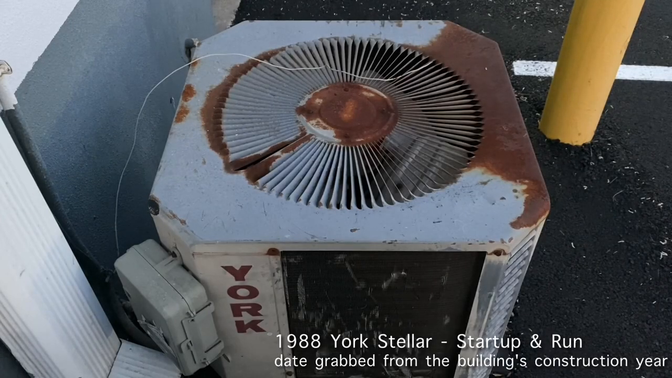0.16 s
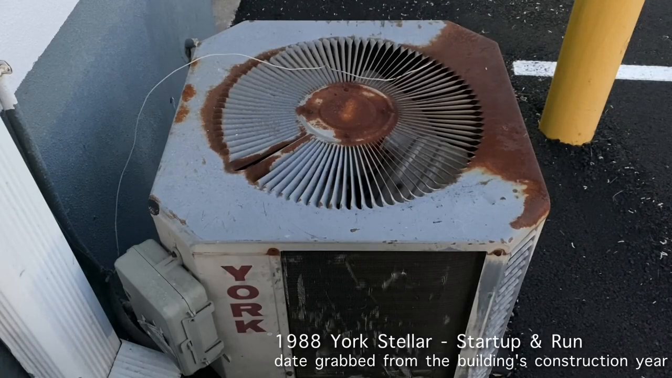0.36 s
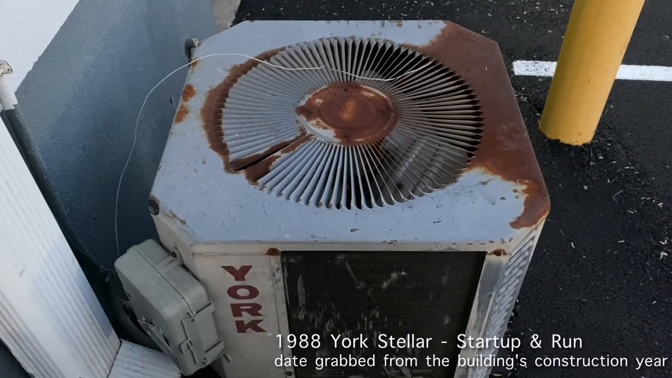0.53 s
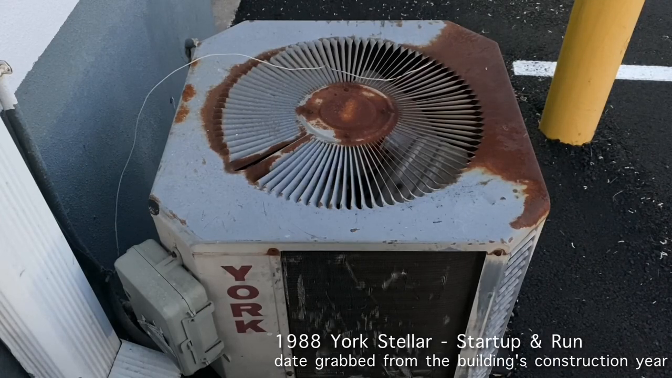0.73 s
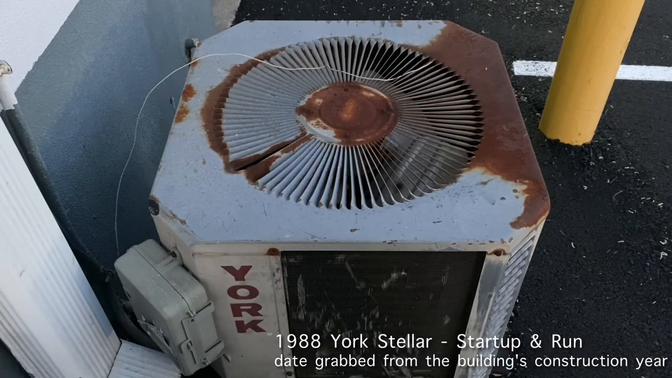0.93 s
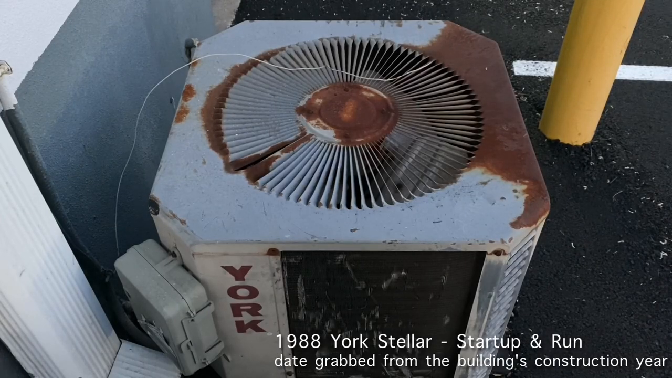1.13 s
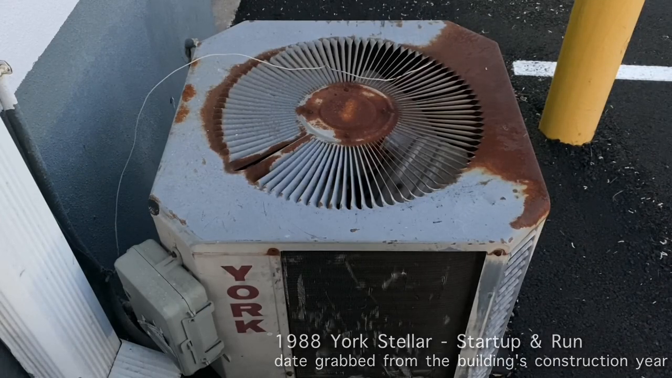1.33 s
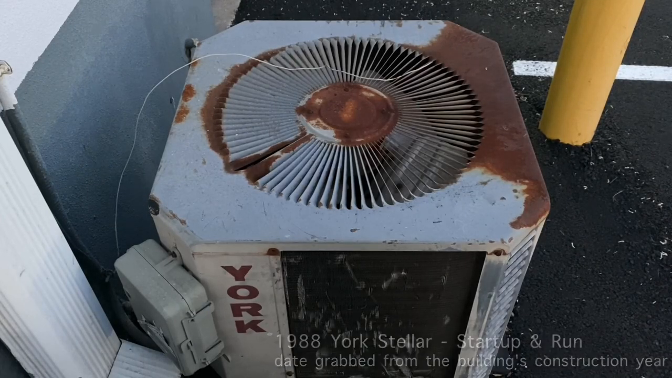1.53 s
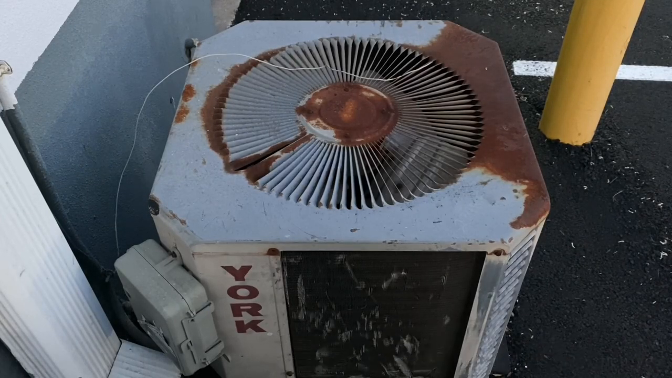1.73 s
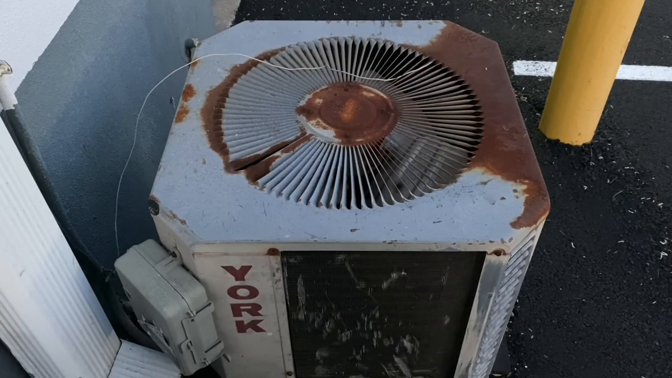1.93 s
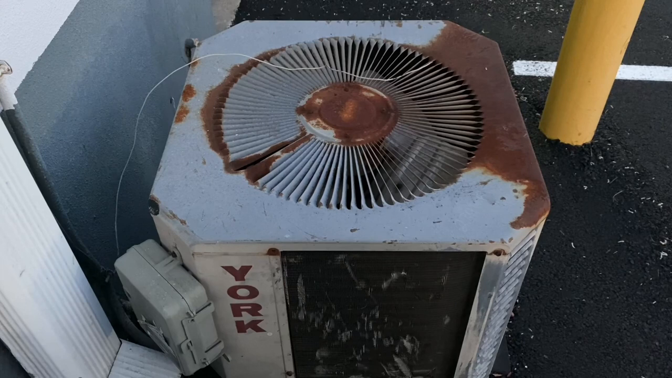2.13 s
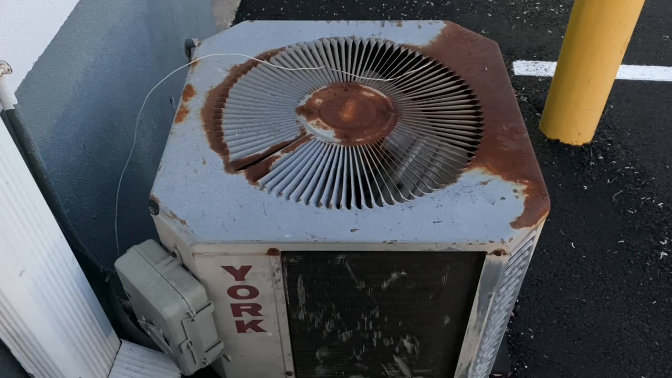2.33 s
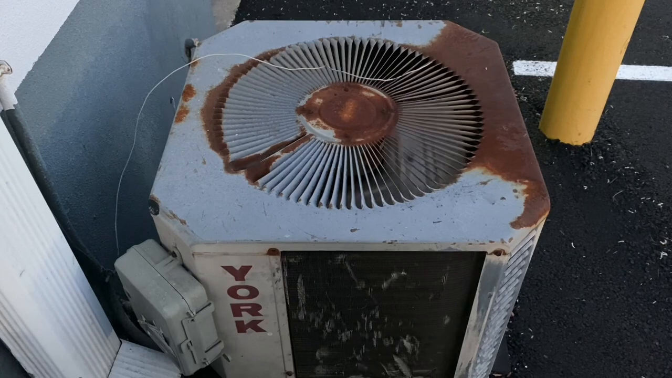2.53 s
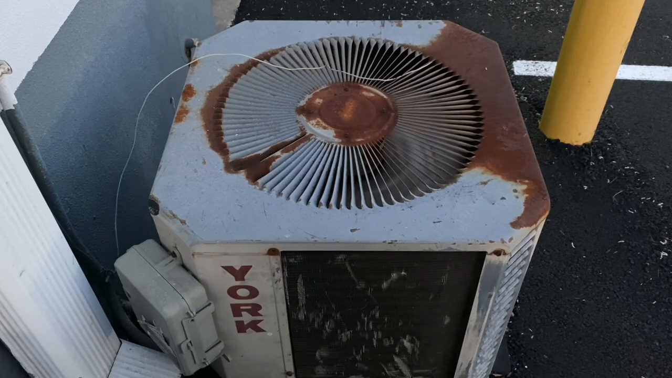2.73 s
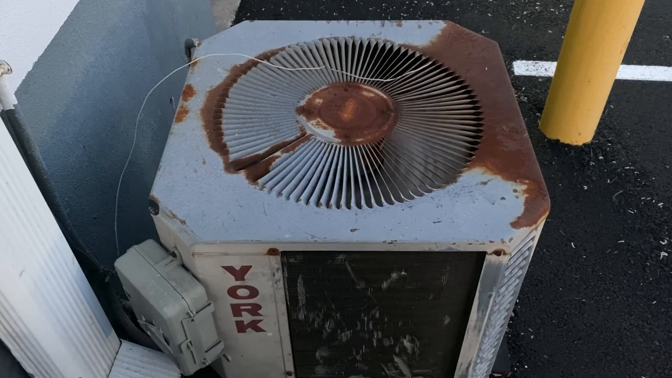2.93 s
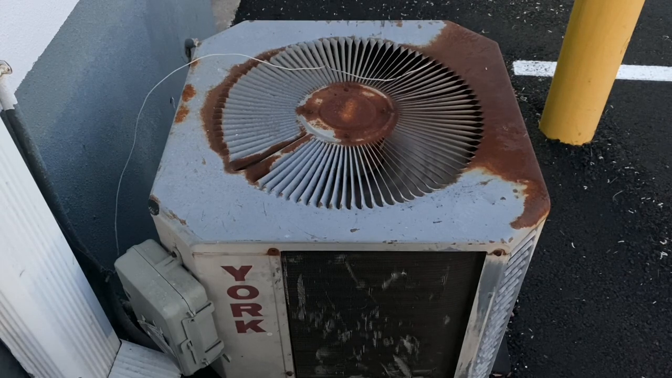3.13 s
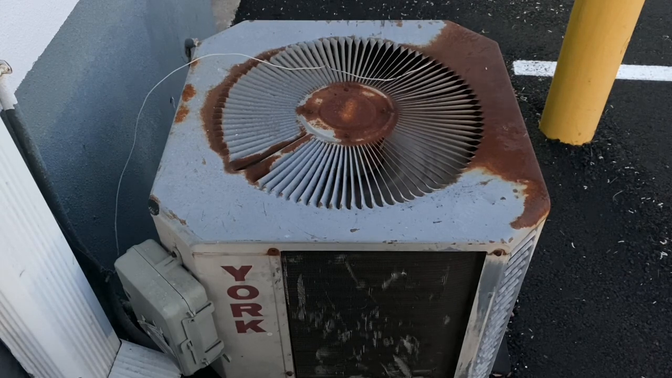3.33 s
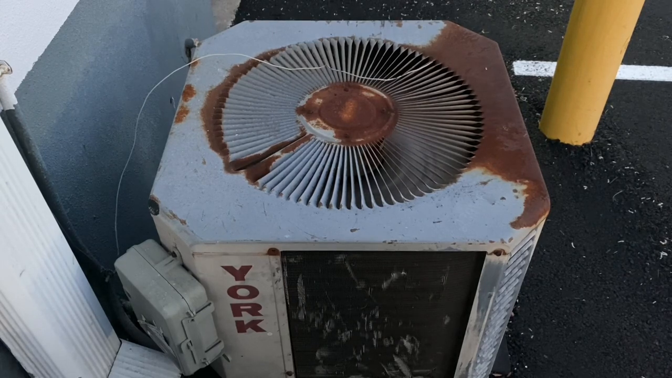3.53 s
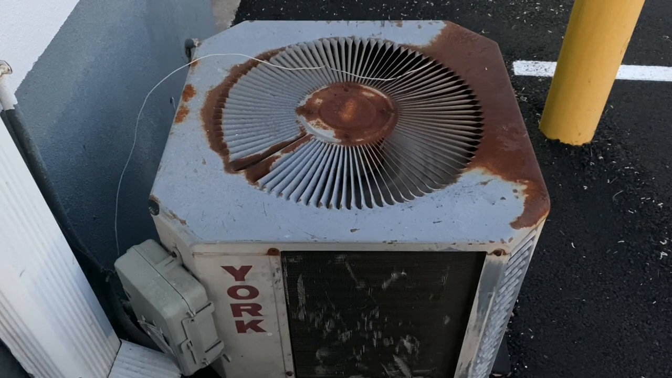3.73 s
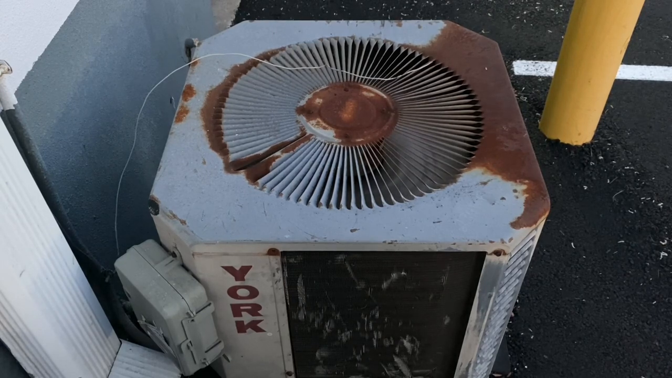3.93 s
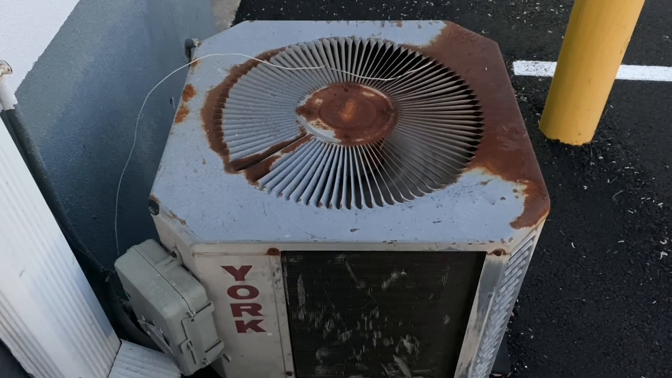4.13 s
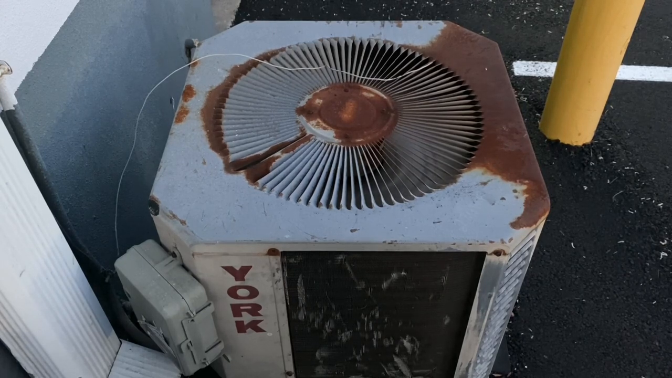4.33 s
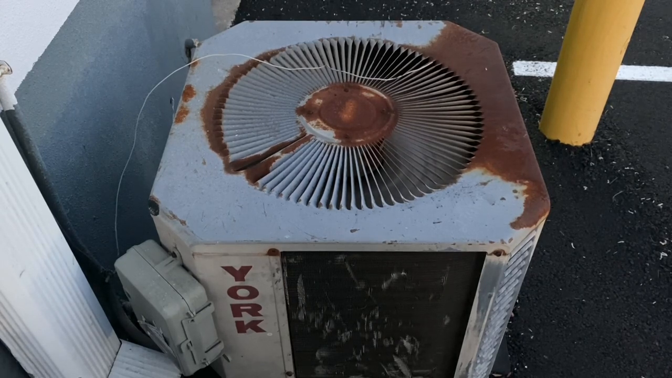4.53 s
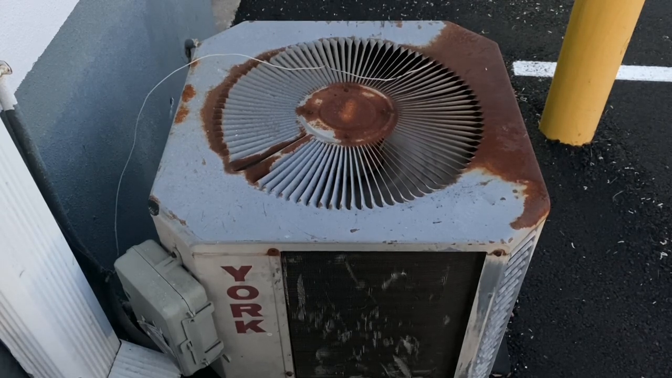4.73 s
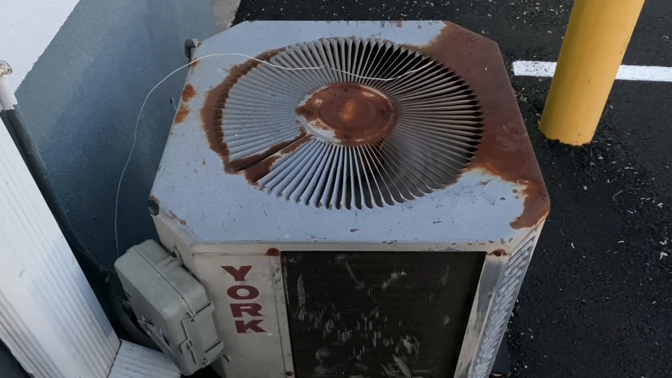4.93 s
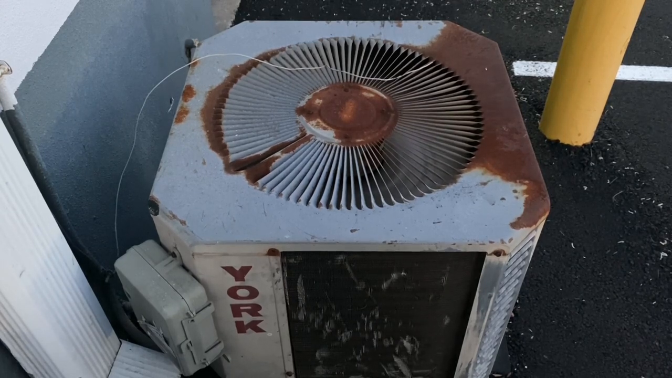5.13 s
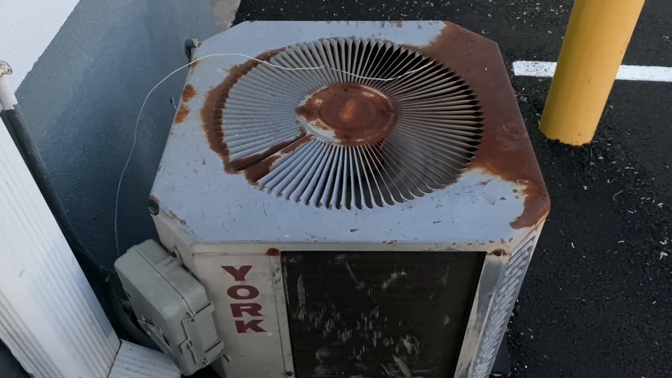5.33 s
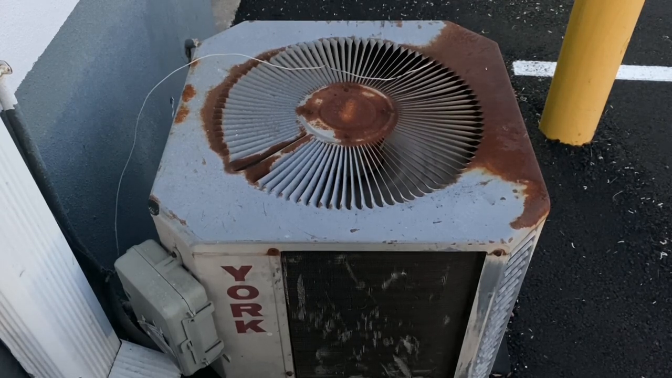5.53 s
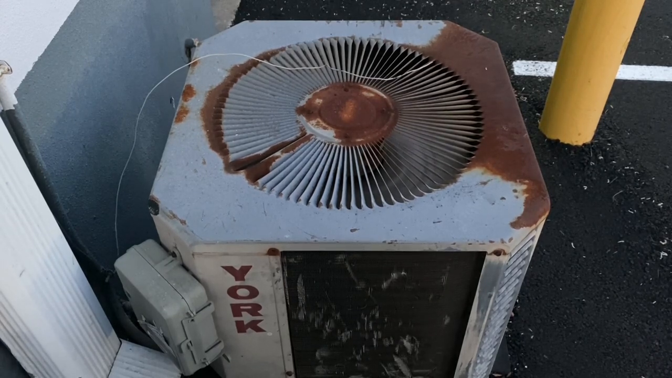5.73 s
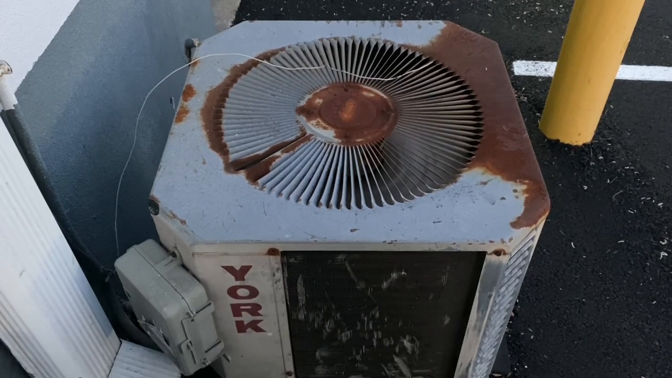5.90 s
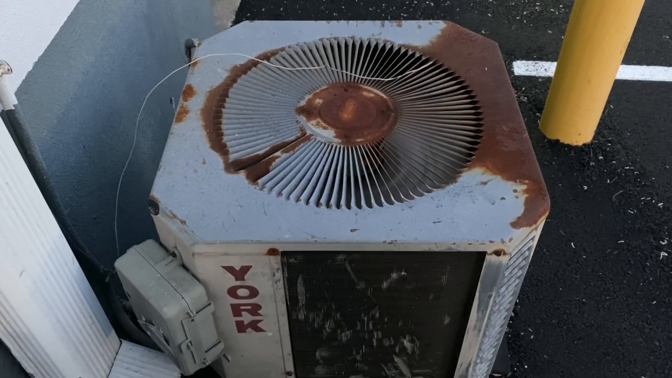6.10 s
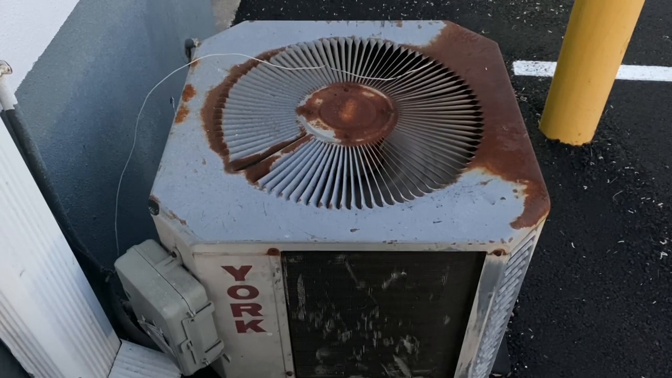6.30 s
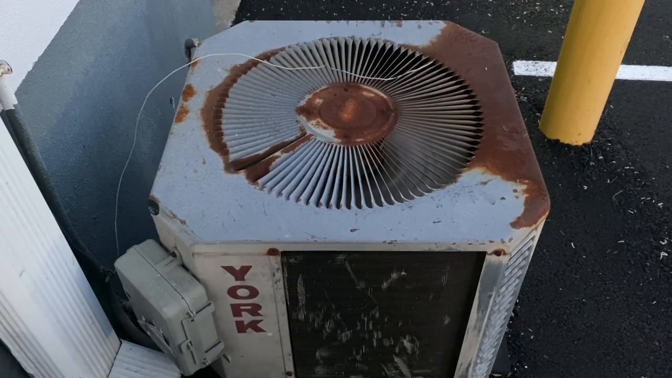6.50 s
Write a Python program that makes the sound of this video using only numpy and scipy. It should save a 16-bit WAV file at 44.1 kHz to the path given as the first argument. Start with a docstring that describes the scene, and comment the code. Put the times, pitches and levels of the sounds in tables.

```python
"""Distant machines drone over a deep rumble, with faint chirps; then an old outdoor air conditioner starts
close by, beside a wall. The contactor clacks and the cabinet rings; the compressor, built from harmonics
of its shaft, buzzes in, then mellows as pressure builds. Filtered noise makes the gas hiss and the fan air.
The fan's blade tones rise in pitch, and gusts flutter across the microphone pair as falling sines in noise."""
import sys
import numpy as np
from scipy import signal
from scipy.fft import rfft, irfft
from scipy.io import wavfile
from scipy.ndimage import uniform_filter1d

SR = 44100
rng = np.random.default_rng(int(sys.argv[2]) if len(sys.argv) > 2 else 0)


def digitize_waveform(pressure):
    """Quantize a signal to 16-bit integers and store it at the path in sys.argv[1].

    Rows of a 2-D input are taken as channels; values are limited to [-1, 1].
    """
    field = np.atleast_2d(pressure).T
    bounded = np.clip(field, -1, 1)
    quanta = np.round(bounded * 32767).astype(np.int16)
    wavfile.write(sys.argv[1], SR, quanta)


N = 289296
T = np.arange(N) / SR  # time of every sample (s)
HZ = np.fft.rfftfreq(N, 1 / SR)  # frequency of every spectrum bin

START_S = 2.567  # the motors switch in
BUZZ_ATTACK_S, SPIN_UP_S = 0.0033, 0.6  # time constants of the compressor's and the fan's start
FREE_SHAFT_HZ, LOADED_SHAFT_HZ = 58.47, 58.345  # the shaft sags as the pressure builds
VALVE_LAG_TURNS = .5  # how long after the knock the discharge valve sounds


def amp(db):
    """Decibels to gain."""
    return 10 ** (np.asarray(db) / 20)


def unit(x):
    """Scales to rms 1."""
    return x / np.sqrt(np.mean(x ** 2) + 1e-20)


def over_hz(points, hz):
    """Reads a spectrum on a log-frequency axis."""
    f, value = np.transpose(points)
    return np.interp(np.log(hz + 1), np.log(f + 1), value)


def over_time(points, column=1):
    """Reads one column of a control curve at every sample."""
    rows = np.transpose(points)
    return np.interp(T, rows[0], rows[column])


def add(mix, s, sound):
    """Mixes a sound in at time s."""
    part = mix[round(s * SR):][:len(sound)]
    part += sound[:len(part)]


def rise(s, width_s):
    """An S-curve from 0 to 1, halfway at time s."""
    return .5 + .5 * np.tanh((T - s) / (2 * width_s))


def onset(s, attack_s):
    """Nothing before time s, then an exponential approach to 1."""
    return 1 - np.exp(-np.maximum(T - s, 0) / attack_s)


def drift(per_s):
    """Random wandering around 0: per_s normal draws a second, joined by straight lines."""
    knots = rng.standard_normal(1024)
    return np.interp(T * per_s, np.arange(len(knots)), knots)


def noise(spectrum, apart, patchy_db=0, ripple_db=0):
    """Two-channel noise shaped in dB per Hz, with drifting patches and a fixed, random fine ripple over frequency.

    The share `apart` of its power is opposite in the two channels.
    """
    common, own = rng.standard_normal((2, N))
    apart = np.clip(apart, 0, 1)
    pair = np.sqrt(1 - apart) * common + np.sqrt(apart) * np.array([own, -own])
    z = signal.stft(pair, nperseg=1024)[2]
    blur = np.outer(np.hanning(7), np.hanning(30))
    patches = signal.fftconvolve(rng.standard_normal(z.shape[1:]), blur, "same")
    pair = signal.istft(z * amp(patchy_db * unit(patches)), nperseg=1024)[1][:, :N]
    ripple = np.interp(HZ, np.linspace(0, SR / 2, 600), rng.standard_normal(600))
    gain = amp(over_hz(spectrum, HZ) + ripple_db * ripple)
    return irfft(rfft(pair) * gain, N) * np.sqrt(SR / 2)


def tone(turns, db, in_step=False):
    """A sine of the given rms level, at a chance phase unless it runs in step with its drive."""
    phase = 0 if in_step else rng.random()
    return np.sqrt(2) * amp(db) * np.sin(2 * np.pi * (turns + phase))


def strokes(turns, orders, smear, apart, size=4096):
    """One ringing knock a turn; smear scatters the orders' phases, apart sets the channels against each other."""
    order, db = np.transpose(orders)
    shared, own = rng.standard_normal((len(order), 2)).T
    phase = smear * shared + apart * np.array([own, -own])
    lines = np.zeros((2, size // 2 + 1), complex)
    lines[:, np.rint(order).astype(int)] = amp(db) * np.exp(1j * phase)
    cycle = irfft(lines) * size / np.sqrt(2)
    return np.array([np.interp(turns % 1, np.arange(size) / size, c) for c in cycle])


def warming(turns, orders, warm, smear, apart):
    """A knock whose orders pass from their cold levels to their warm ones."""
    out = np.zeros((2, N))
    for k, cold_db, warm_db in orders:
        shared, own = rng.standard_normal(2)
        phase = smear * shared + apart * np.array([[own], [-own]])
        level = amp(cold_db + (warm_db - cold_db) * warm)
        out += np.sqrt(2) * level * np.cos(2 * np.pi * round(k) * turns + phase)
    return out


def pressure():
    """Head pressure climbs along an S-curve, from 0 at rest towards 1 in the steady run."""
    return rise(4.55, 0.497)


def shaft_turns(overshoot_turns=0.06, overshoot_s=0.098):
    """Turns of the compressor shaft since the start; it gains a little extra at first."""
    turns = np.cumsum(FREE_SHAFT_HZ + (LOADED_SHAFT_HZ - FREE_SHAFT_HZ) * pressure()) / SR
    return turns - np.interp(START_S, T, turns) - overshoot_turns * (1 - onset(START_S, overshoot_s))


def compressor(jitter_turns=0.0021, flicker_db=-1.5, stumble_extra=5.7, stumble_s=0.053):
    """Two pistons knock in a steel shell; panel and valves join in, the case rocks and the windings hum."""
    turns, load = shaft_turns(), pressure()
    # no two strokes are quite alike in timing or force, least of all the first few
    stumble = 1 + stumble_extra * (1 - onset(START_S, stumble_s))
    uneven = turns + jitter_turns * stumble * drift(70)
    force = amp(np.sqrt(stumble) * drift(40) + flicker_db * np.sqrt(load) * drift(14))
    buzz = force * (shell_knock(uneven) + panel_buzz(uneven))
    buzz += discharge_valve(turns, load) + valve_chatter(turns, load)
    return onset(START_S, BUZZ_ATTACK_S) * (buzz + motor_hum()) + case_rocking(turns)


def shell_knock(turns):
    """The pistons' knock rings the shell; its overtones shift as it warms, and the whole fades with time."""
    # the knock itself: shaft order, cold level/dB, warm level/dB, before the level curve
    knock_orders = [(21, -55, -65), (22, -47, -46.5), (23, -46.5, -49.5), (24, -34.5, -41.5),
                    (25, -45.5, -43.5), (26, -45, -45), (27, -58, -62), (28, -56, -48)]
    # its ringing overtones: shaft order, cold level/dB, warm level/dB, before the level curve
    ring_orders = [(29, -60, -59), (30, -46, -47.5), (31, -42.5, -55), (32, -47, -53), (34, -46.5, -48.5),
                   (36, -56, -59), (38, -55, -62), (40, -63, -68), (41, -52, -56), (43, -61, -63),
                   (44, -53, -51), (48, -74, -62), (49, -56, -54), (51, -57, -52), (52, -75, -53)]
    # gain of both, swelling after the start, then fading: t/s, level/dB
    cold_level = [(2.57, -2), (2.66, -0.5), (2.8, 2), (3.1, 0.5), (3.5, 0.5), (3.95, -0.5), (4.4, -4.5),
                  (5.0, -9), (5.6, -26)]
    warm = rise(3.2, 0.2)
    shell = warming(turns, knock_orders, warm, smear=0.2, apart=0.3)
    shell += warming(turns, ring_orders, warm, smear=1.0, apart=0.35)
    return amp(over_time(cold_level)) * shell


def panel_buzz(turns, lag_turns=.63):
    """A side panel answers late in each turn and the casing grumbles with it, until both die away."""
    # the panel's harmonics: shaft order, level/dB
    panel_orders = [(6, -48), (10, -62), (12, -50), (13, -59), (15, -57), (16, -43), (17, -44), (18, -50.5)]
    # the casing's grumble: f/Hz, level/dB per Hz
    grumble = [(150, -86), (300, -62.5), (480, -75), (620, -65), (850, -84), (1500, -105)]
    panel = strokes(turns - lag_turns, panel_orders, smear=0.3, apart=0.35)
    panel += noise(grumble, apart=0.23, patchy_db=-0.5)
    return (1 - rise(3.84, 0.19)) * panel


def discharge_valve(turns, load, run_db=0.5):
    """The discharge valve rasps under load, and taps brightly, half a turn after the knock."""
    # the shell's lines under pressure, moved to the nearest shaft order: f/Hz, level/dB before the run gain
    run_lines = [(1340, -55), (1572, -56), (1690, -58), (1981, -55), (2509, -57), (2568, -54.5),
                 (2681, -60), (3031, -57), (3149, -53), (3208, -59.5), (3262, -59), (3731, -62),
                 (3790, -63), (3849, -65), (3962, -62), (5190, -64), (5249, -67), (6880, -70)]
    # the tap's harmonics: shaft order, level/dB before the level curve
    tap_orders = [(73, -88), (74, -54), (75, -79), (76, -65), (77, -66), (78, -65), (79, -65), (80, -63.5),
                  (81, -57), (82, -64), (83, -79)]
    # gain of the tap: t/s, level/dB
    tap_level = [(2.9, -22), (3.2, -14), (4.55, -11), (4.72, 2), (4.95, 2.5), (5.2, 2.5), (5.42, -14),
                 (5.75, 1), (6.15, -2.5), (6.56, -4)]
    valve_turns = turns - VALVE_LAG_TURNS
    run_orders = np.array(run_lines) / [LOADED_SHAFT_HZ, 1]
    rasp = strokes(valve_turns, run_orders, smear=0.49, apart=0.22)
    taps = strokes(valve_turns + 0.00093 * drift(58), tap_orders, smear=0.17, apart=0.28)
    return load * amp(run_db + drift(12)) * rasp + amp(over_time(tap_level)) * taps


def valve_chatter(turns, load, uneven_db=3, shimmer_hz=0.33, start_db=0.5, fade_db=4.5, attack_s=0.048):
    """The valves chatter on the shaft orders from 4 to 259, softer as pressure builds."""
    # envelope over the orders: f/Hz, level/dB an order, before unevenness and gain
    valves = [(230, -53), (450, -79), (620, -45), (800, -62), (1150, -77), (1450, -56), (1650, -68),
              (2000, -55.5), (2750, -62), (3100, -68), (3900, -73), (4600, -69), (5600, -78), (15000, -103)]
    order = np.arange(4, 260)
    out = np.zeros((2, N))
    # three patterns melt steadily into one another
    for k in range(3):
        db = over_hz(valves, order * LOADED_SHAFT_HZ)
        db = db + uneven_db * (rng.standard_normal(len(order)) - .5)
        share = np.cos(np.pi * (shimmer_hz * T + k / 3)) * np.sqrt(2 / 3)
        out += share * strokes(turns, np.c_[order, db], smear=1.94, apart=0.58)
    return onset(START_S, attack_s) * amp(start_db - fade_db * load) * out


def motor_hum(mains_hz=60):
    """Magnetic hum of the windings on mains multiples; the shaft slips behind, so the two throb."""
    # multiple of the mains, level/dB, swells at t/s, rise time/s, level lost in the lull/dB
    hum_tones = [(2, -28.5, 3.08, 0.19, 29), (4, -34, 3.63, 0.35, 8.5), (6, -39.5, 3.24, 0.074, 7.5)]
    mains = mains_hz * (T - START_S)
    lull = rise(4.68, 0.12) - rise(5.805, 0.12)  # the hum sinks for a while
    hum = 0
    for k, db, s, rise_s, lull_db in hum_tones:
        hum = hum + rise(s, rise_s) * tone(round(k) * mains, db - lull_db * lull, in_step=True)
    return hum


def case_rocking(turns, sway_turns=0.024):
    """The case rocks on its feet at low shaft orders, then settles."""
    # shaft order, level/dB, swells at t/s, rise time/s, settles at t/s, settled level/dB
    rocking = [(1, -34, 3.5, 0.37, 4.87, -49), (2, -33, 2.6, 0.055, 4.35, -47),
               (3, -27.8, 2.564, 0.081, 4.24, -49), (6, -30, 3.62, 0.11, 4.06, -54.5),
               (8, -35, 3.6, .1, 4.1, -72), (10, -39, 3.55, 0.052, 4.57, -58)]
    swaying = turns + sway_turns * drift(22)
    return sum(swell_and_settle(*level) * tone(round(k) * swaying, 0, in_step=True) for k, *level in rocking)


def swell_and_settle(db, swell_s, rise_s, settle_s, settled_db, settling_s=0.16):
    """A gain that swells after the start and moves to its running level."""
    level = amp(db + (settled_db - db) * rise(settle_s, settling_s))
    return onset(START_S, BUZZ_ATTACK_S) * rise(swell_s, rise_s) * level


def contactor(crack_t60=0.048, tail_db=-12.0, tail_t60=0.28, ring_db=-32.5, dull_hz=3500, rattle_db=3.0):
    """The relay slams and bounces as decaying noise (t60 in s); the cabinet rings and rattles."""
    # the contact closing and bouncing: t/s, level/dB
    clacks = [(2.3347, -6), (2.3382, -1.5), (2.34, -4), (2.349, -16), (2.3635, -20)]
    # colour of the clack: f/Hz, level/dB per Hz, before the blows' levels
    clack_colour = [(90, -50), (300, -59), (460, -51), (680, -68), (1150, -50.5), (1450, -47.5),
                    (1780, -48), (2400, -63), (3300, -54), (4100, -50.5), (5100, -63), (6500, -58.5),
                    (11000, -61), (16000, -65)]
    # cabinet modes: f/Hz, level/dB before the ring gain, time to fall 60 dB/s
    cabinet = [(235, -1, 1), (582, -16, 0.44), (764, -12.5, 0.44), (980, -5.5, 0.31), (1226, -8, 0.3),
               (1900, -14, 0.38), (2270, -14, 0.26), (3670, -15, 0.22), (4030, -17, 0.17),
               (4440, -15, 0.14), (6340, 1, 0.048)]
    blows = np.zeros(N)
    for s, db in clacks:
        add(blows, s, amp([db]))
    t = T[:SR]

    def dying(t60):
        """Adds up the decaying power of all the blows."""
        return np.sqrt(abs(signal.fftconvolve(blows ** 2, amp(-120 * t / t60))[:N]))

    crack = noise(clack_colour, apart=0.11) * dying(crack_t60)
    low_pass = signal.butter(2, dull_hz, fs=SR)
    tail = signal.lfilter(*low_pass, noise(clack_colour, apart=0.35, ripple_db=1.5)) * dying(tail_t60)
    tail *= amp(rattle_db * drift(220))
    ring = np.zeros(N)
    add(ring, clacks[1][0], sum(tone(hz * t, db - 60 * t / t60) for hz, db, t60 in cabinet))
    return crack + amp(tail_db) * tail + amp(ring_db) * ring


def ticks(t60=0.037):
    """Loose metal knocks and ticks as the load comes on: short bursts around one pitch of the sheet metal."""
    # t/s, level/dB, f/Hz
    metal_ticks = [(2.5665, -29.5, 1470), (2.592, -28, 775), (2.629, -20, 372), (2.636, -27, 1495),
                   (2.658, -34, 2960), (2.663, -39, 720), (3.010, -41, 7800), (3.011, -45, 14000),
                   (3.322, -46, 13500), (3.324, -44, 7600)]
    out, t = np.zeros(N), T[:SR // 10]
    for s, db, hz in metal_ticks:
        band = signal.butter(2, [hz * .75, hz * 1.3], "band", fs=SR)
        burst = signal.lfilter(*band, rng.standard_normal(len(t)))
        add(out, s, unit(burst) * amp(db - 60 * t / t60))
    return out


def refrigerant(puff=0.15, stroke_puff=0.088, song_width_hz=650, song_pulse=0.66, attack_s=0.0025):
    """Gas hisses through the tubing, one puff for each piston stroke, and sings at a moving resonance."""
    # the hiss: f/Hz, level/dB per Hz, before the flow gain
    gas = [(400, -71.5), (900, -72), (1500, -78), (2400, -79), (2800, -79), (3150, -77), (3550, -81),
           (4600, -84), (5800, -91.5), (6300, -86.5), (6750, -88), (7300, -86), (7800, -85.5), (9000, -96),
           (10700, -91.5), (12700, -89), (15600, -96)]
    # the tubing sings higher as pressure builds, then falls back: t/s, f/Hz, level/dB
    song_curve = [(3.5, 3320, -66), (4.2, 3610, -47), (4.52, 3895, -49.5), (4.72, 4090, -47),
                  (4.95, 4275, -46), (5.2, 4450, -55), (5.42, 3930, -63), (5.95, 3840, -68),
                  (6.33, 3920, -47), (6.56, 3860, -56)]
    idle_db, lead_s, gas_db, growth_db, full_at = -20.5, 0.033, -4.5, 4.5, 0.25
    turns, load = shaft_turns(), pressure()
    puffs = unit(np.exp(stroke_puff * np.cos(2 * np.pi * turns) + puff * np.cos(4 * np.pi * turns)))
    # faint at rest, the hiss opens just before the first knock and grows with pressure
    flow = onset(START_S - lead_s, attack_s) * amp(gas_db + growth_db * np.minimum(load / full_at, 1))
    flow = np.maximum(flow, amp(idle_db))
    hiss = noise(gas, apart=0.02, patchy_db=3.5, ripple_db=2.0) * flow * amp(1.0 * drift(16))
    low_pass = signal.butter(2, song_width_hz / 2, fs=SR)
    flicker = signal.lfilter(*low_pass, rng.standard_normal(N) + 1j * rng.standard_normal(N))
    # the song swells once a turn, with the stronger piston
    flicker *= np.exp(song_pulse * np.cos(2 * np.pi * (turns - VALVE_LAG_TURNS)))
    carrier = np.exp(2j * np.pi * np.cumsum(over_time(song_curve, column=1)) / SR)
    song = onset(START_S, SPIN_UP_S) * amp(over_time(song_curve, column=2)) * unit((flicker * carrier).real)
    return puffs * hiss + song


def fan(blade_hz=70.3, waver_turns=0.021):
    """The blades gather speed; their tones and the rush of air grow with it."""
    # blade-passing tones at full speed: multiple of the blade rate, level/dB
    blade_tones = [(1, -53), (2, -43.5), (3, -51.5), (5, -49), (9, -52), (10, -58), (12, -50.5)]
    # rushing air at full speed: f/Hz, level/dB per Hz
    air = [(50, -88), (150, -70), (300, -66), (480, -67), (720, -65), (1050, -70), (1350, -71), (1650, -77),
           (1950, -70.5), (2300, -71), (2800, -91), (4000, -86.5), (8000, -102)]
    speed = onset(START_S, SPIN_UP_S)
    passes = np.cumsum(blade_hz * speed) / SR + waver_turns * drift(8)
    tones = sum(tone(round(k) * passes, db) for k, db in blade_tones)
    rush = noise(air, apart=0.28, patchy_db=1.3) * amp(0.37 * drift(14))
    return speed * (tones + rush)


def wash(lumpy_db=2.5, small_db=-6, spread_db=7, count=70):
    """Fan air buffets the microphone: a rumble, large eddies and a crowd of small ones."""
    # colour of the rumble on the microphone: f/Hz, relative level/dB
    buffet = [(18, -24), (35, -13), (60, 6.5), (110, 0.5), (200, -6.5), (350, -17.5), (600, -23),
              (1000, -39), (2000, -34), (6000, -86)]
    # gusts of fan air: start t/s, length/s, level/dB
    gusts = [(3.509, .3, -28.5), (3.955, .65, -17.5), (4.68, 0.1694, -31), (5.042, .08, -22.5),
             (5.186, .025, -26), (6.06, .5, -30)]
    # the strongest eddies: t/s, level/dB, first f/Hz, last f/Hz, length/s
    eddies = [(4.011, -22, 170, 110, 0.01), (4.032, -5.5, 504, 64.3, 0.031), (4.105, -15, 460, 330, 0.0096),
              (4.118, -10.5, 202, 91, 0.02), (4.150, -7, 600, 179, 0.013), (4.163, -5, 685, 398, 0.0081),
              (4.167, -5.5, 241, 149, 0.0063), (4.201, -14, 180, 70, 0.008), (4.229, -6, 150, 80, 0.0073),
              (4.269, -3, 720, 146, .011), (4.281, -11, 150, 90, 0.029), (4.315, -10, 460, 250, 0.01),
              (4.327, -6, 720, 207, 0.013), (4.352, -12, 130, 80, 0.037), (4.385, -5.5, 794, 81, 0.017),
              (4.414, -15.5, 860, 647, 0.009), (4.421, -5, 291, 64, 0.037), (4.451, -8.5, 830, 371, 0.0049),
              (4.481, -21, 650, 300, 0.0037), (4.506, -10, 288, 39.8, 0.032),
              (4.538, -16.5, 479, 412, 0.037), (4.547, -4.5, 400, 172, 0.0096),
              (4.581, -14, 1200, 630, 0.0093), (4.584, -4, 420, 348, 0.0082),
              (4.603, -10.5, 180, 109, 0.015), (4.613, -12, 540, 437, 0.0075),
              (4.627, -12.5, 378, 177, 0.013), (4.633, -18, 600, 447, 0.005),
              (4.654, -12.5, 805, 308.6, 0.0093), (4.690, -13, 190, 120, 0.0086),
              (4.740, -18.5, 320, 253, 0.011), (4.753, -18, 223, 149, 0.008), (5.064, -24, 170, 80, 0.0089),
              (5.080, -10, 140.7, 70, 0.0089), (5.093, -16, 574, 288, 0.012),
              (5.108, -18, 141, 44.8, 0.023), (5.132, -21, 480, 353, 0.0045),
              (5.155, -18, 524, 288, 0.0044), (5.188, -21.5, 620, 392, 0.01), (5.195, -15, 220, 114, 0.013),
              (5.202, -22, 500, 388, 0.0071)]
    attack_s, release_s, breeze_db = 0.029, 0.019, -41
    strength = amp(breeze_db) * onset(START_S, SPIN_UP_S) ** 2
    for s, length, db in gusts:
        strength = strength + amp(db) * onset(s, attack_s) * (1 - onset(s + length, release_s))
    rumble = unit(noise(buffet, apart=0.13))
    # even out the rumble's own level, so that the gusts set it
    local_power = uniform_filter1d((rumble ** 2).mean(0), 3000)
    rumble *= strength * amp(lumpy_db * drift(25)) / np.sqrt(local_power)
    # small eddies crowd in where the gust is strong
    crowd = np.cumsum(strength ** 1.4)
    place, size, pitch = rng.random((count, 3)).T
    times = np.interp((np.arange(count) + place) / count, crowd / crowd[-1], T)
    levels = 20 * np.log10(np.interp(times, T, strength)) + small_db + spread_db * (.5 - size)
    small = [(s, db, 300 + 500 * b, 150 + 300 * b, .005) for s, db, b in zip(times, levels, pitch)]
    for s, *shape in list(eddies) + small:
        for channel, sound in zip(rumble, eddy(*shape)):
            add(channel, s, sound)
    return rumble


def eddy(db, first_hz, last_hz, length, glide_share=0.2966, attack_s=0.0017, wake_db=-16,
         skew_turns=0.23, rough=0.26, ragged_turns=0.074, churn_hz=520):
    """An eddy sweeps past the ports: a ragged flutter that falls in pitch and leaves a weak wake."""
    t = T[:SR // 8]
    phase, skew = rng.random(2)
    pitch = last_hz + (first_hz - last_hz) * np.exp(-t / (glide_share * length))
    body = np.exp(-(t / length) ** 2) + amp(wake_db) * np.exp(-t / (3 * length))
    swell = (1 - np.exp(-(t / attack_s) ** 2)) * body
    # turbulence jostles its strength and its timing
    force, slip = (np.interp(t * churn_hz, np.arange(len(knots)), knots)
                   for knots in rng.standard_normal((2, 128)))
    between_ports = skew_turns * (skew - .5) * np.array([[1], [-1]])
    turns = np.cumsum(pitch) / SR + phase + ragged_turns * slip + between_ports
    return amp(db) * swell / swell.max() * (1 + rough * force) * np.sin(2 * np.pi * turns)


def surroundings(waver_turns=0.21):
    """Other machines hum far off, as wavering tones in noise, over a deep rumble.

    The rumble, their lowest bass, is cut by the microphone's wind filter from about 4.8 s.
    """
    # distant machines: f/Hz, level/dB per Hz
    drone = [(25, -83), (50, -67), (75, -58.5), (115, -57.5), (165, -69.5), (250, -67), (450, -73),
             (580, -76.5), (790, -80.5), (1200, -86.5), (1520, -90), (1690, -82.5), (1780, -94),
             (1900, -84.5), (2200, -84.5), (2330, -88), (2900, -90.5), (3300, -97), (4300, -92),
             (9000, -113), (15000, -125)]
    # their steady tones: f/Hz, level/dB
    drone_tones = [(118, -49.5), (176, -56), (240, -51.5), (292, -53), (310, -53.5), (415, -63),
                   (473.7, -78), (2213, -67)]
    # the deep rumble under them, until the wind filter cuts it: f/Hz, level/dB per Hz
    deep_rumble = [(20, -72), (40, -53.5), (58, -60.5), (100, -76), (400, -130)]
    tones = sum(tone(hz * T + waver_turns * drift(5), db) for hz, db in drone_tones)
    wind_filter = 1 - rise(4.8, .1)
    deep = noise(deep_rumble, apart=.03) * wind_filter
    return noise(drone, apart=.13, patchy_db=1.6) * amp(.5 * drift(9)) + tones + deep


def chirps(spread=0.088):
    """Faint, breathy chirps far off: narrow bands of noise under short bell-shaped swells."""
    # middle t/s, length/s, f/Hz, level/dB
    far_chirps = [(0.718, 0.074, 4240, -59), (1.66, .06, 3500, -63)]
    out = np.zeros(N)
    for s, length, hz, db in far_chirps:
        band = signal.butter(2, [hz * (1 - spread), hz * (1 + spread)], "band", fs=SR)
        breath = signal.lfilter(*band, rng.standard_normal(N))
        out += unit(breath) * amp(db) * np.exp(-(2 * (T - s) / length) ** 2)
    return out


def scene():
    """All sources at the microphone."""
    machine = compressor() + contactor() + ticks() + refrigerant() + fan()
    return machine + wash() + surroundings() + chirps()


def record(dry, low_cut_hz=33, mono_hz=55, edge_hz=15850):
    """The two ports share the bass and differ above it; loud peaks are rounded off; then the band limit."""
    # phase between the ports: f/Hz, left lead/rad
    port_phase = [(0, 0), (780, .2), (3100, .5), (6600, 0), (7500, -.25), (9050, -3.14), (10900, -6.28),
                  (13250, -9.42), (15200, -12.57)]
    # balance of the ports: f/Hz, left minus right level/dB
    port_balance = [(60, 1), (270, 2.2), (650, 3), (1000, 4.5), (1350, -1.5), (2000, 1.5), (3200, 2),
                    (5500, 1.5), (9000, 0)]
    z = rfft(dry) / np.sqrt(1 + (low_cut_hz / (HZ + 1)) ** 8)
    z = z.mean(0) + (z - z.mean(0)) * HZ ** 2 / (HZ ** 2 + mono_hz ** 2)
    lead = np.interp(HZ, *np.transpose(port_phase))
    tilt = amp(over_hz(port_balance, HZ) / 2)
    pair = irfft(z * np.array([tilt, np.exp(-1j * lead) / tilt]), N)
    pair /= (1 + (pair / .95) ** 8) ** (1 / 8)
    low_pass = signal.firwin(511, edge_hz, window=("kaiser", 9), fs=SR)
    return signal.oaconvolve(pair, low_pass[None], "same")


dry = scene()
out = record(dry)
digitize_waveform(out)
```